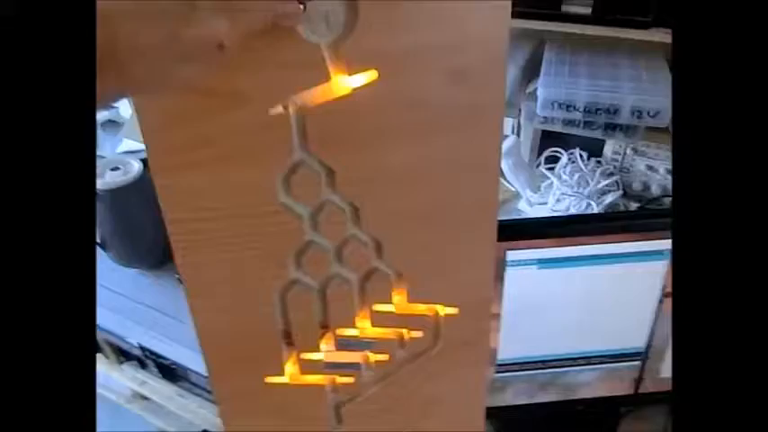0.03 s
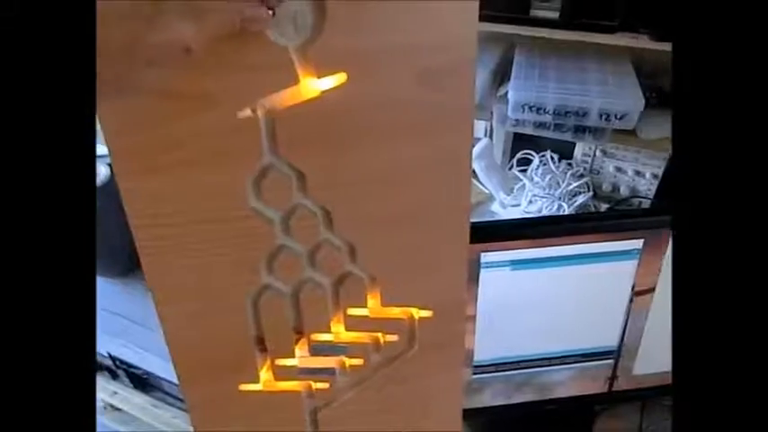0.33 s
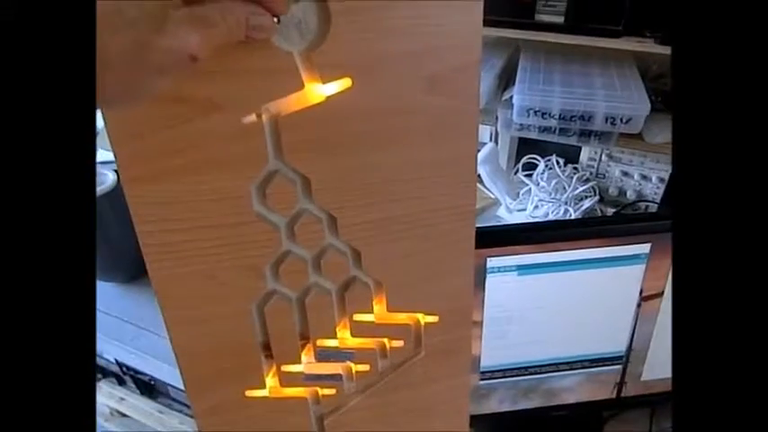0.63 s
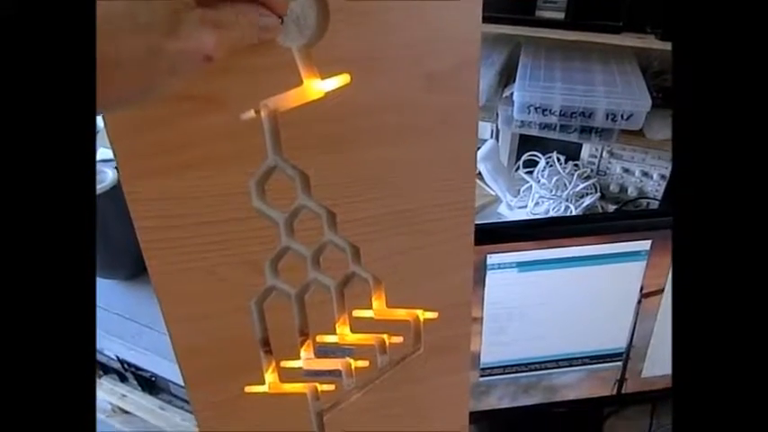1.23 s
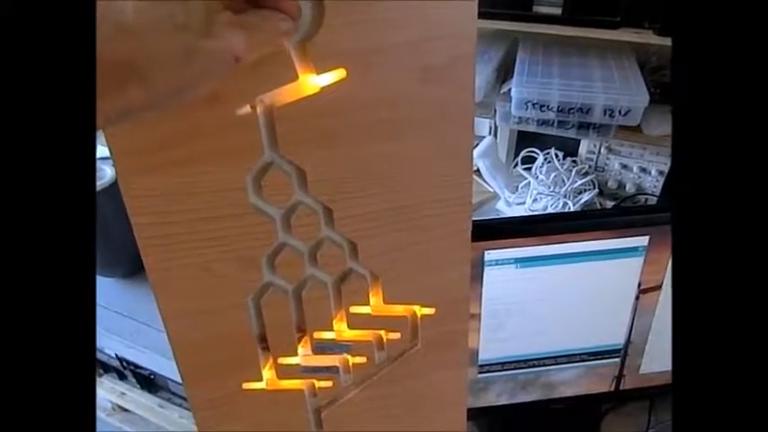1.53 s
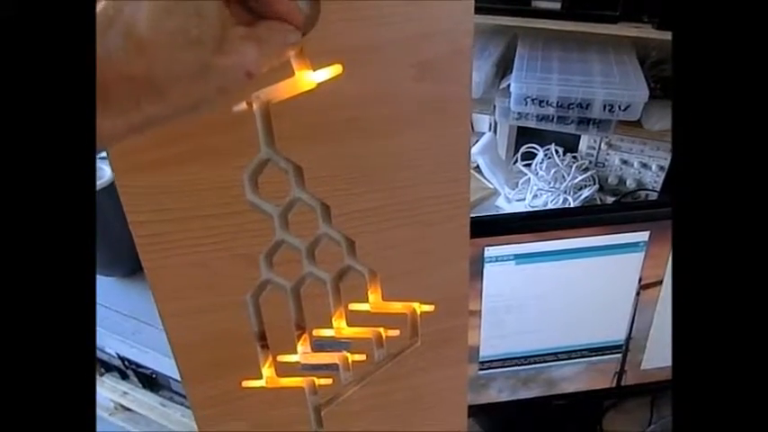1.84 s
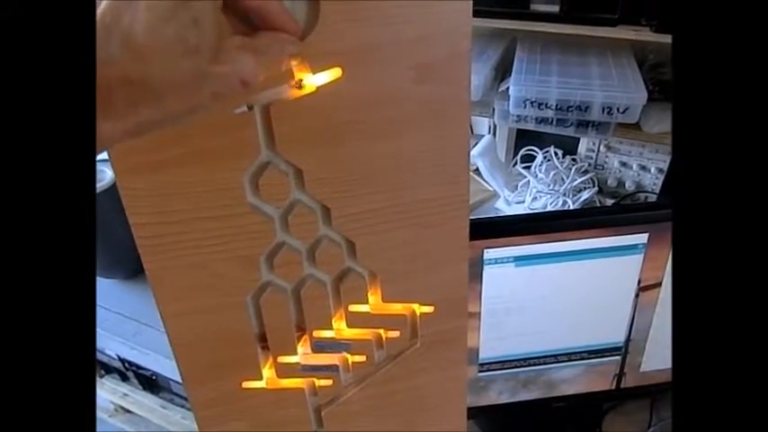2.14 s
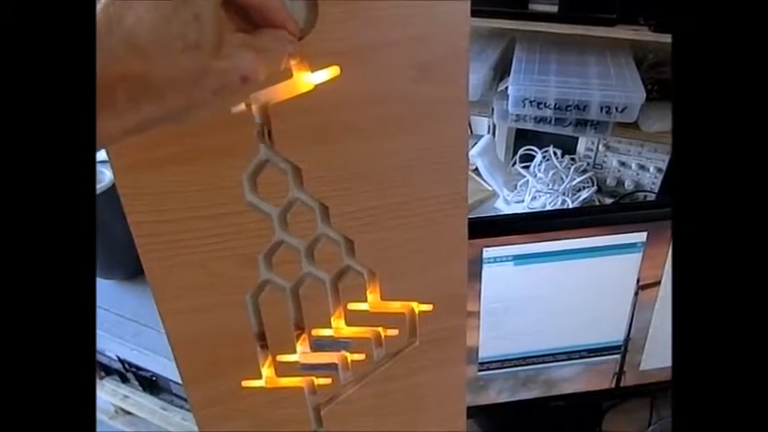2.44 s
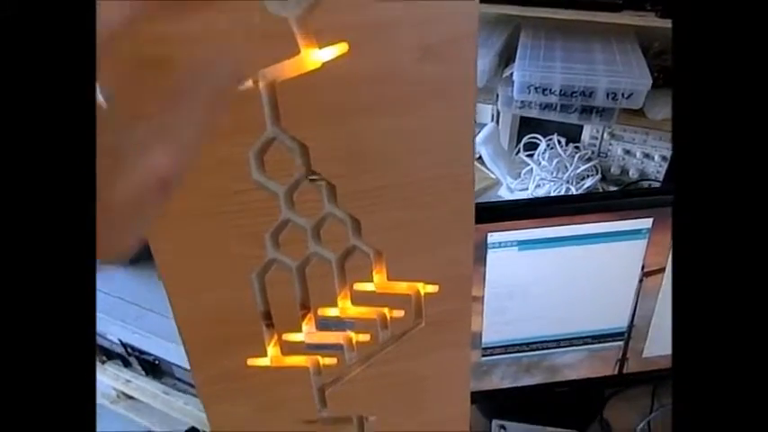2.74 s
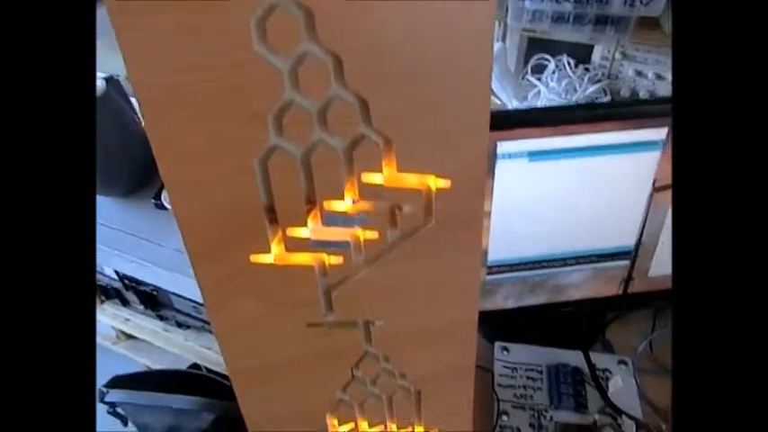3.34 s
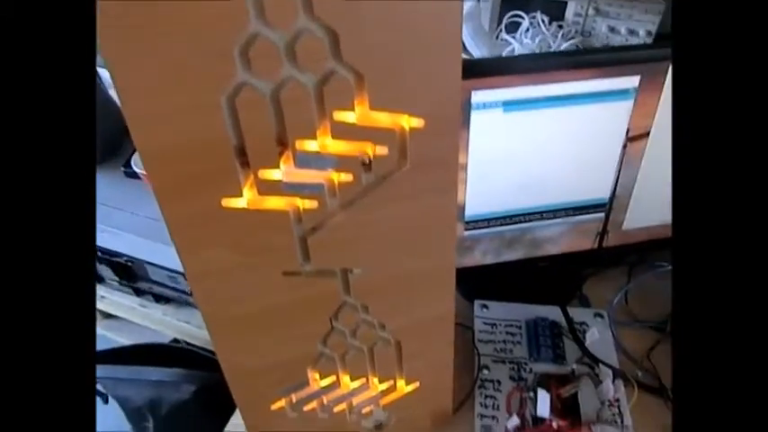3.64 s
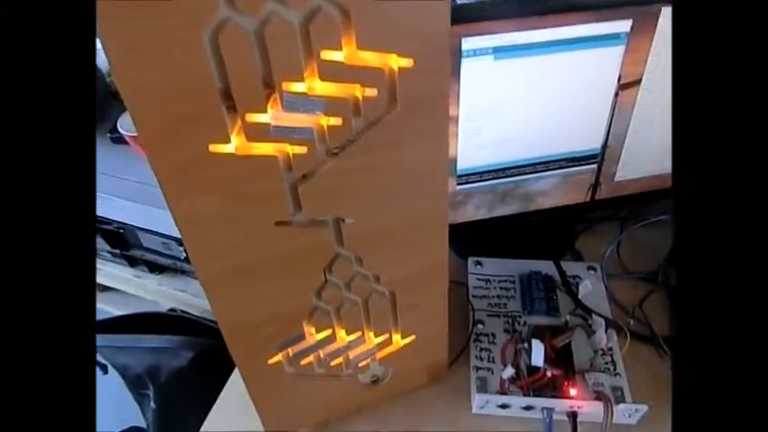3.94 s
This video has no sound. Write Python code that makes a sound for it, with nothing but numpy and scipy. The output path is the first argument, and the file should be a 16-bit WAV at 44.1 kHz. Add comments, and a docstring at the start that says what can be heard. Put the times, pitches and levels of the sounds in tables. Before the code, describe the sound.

A small hard ball clacks and chatters irregularly down the channels of a wooden board.

```python
"""Ball run on a wooden board

On a desk in a small room, close to a stereo pair of microphones, fingers fumble at a plastic gate, then a small
hard ball is let through it and falls down the carved channels of an upright board. It clacks from wall to wall,
chatters and tips small levers; each stretch rings in its own way, the whole board answers, and the room adds a
short tail. Underneath lie soft handling rumble, hiss and a faint whine."""
import sys
import numpy as np
from scipy import signal
from scipy.io import wavfile

SR = 44100
rng = np.random.default_rng(int(sys.argv[2]) if len(sys.argv) > 2 else 0)


def to_wav(s):
    """Save 16-bit WAV."""
    ch = np.atleast_2d(s).T  # columns
    pcm = np.round(np.clip(ch, -1, 1) * 32767)  # PCM
    wavfile.write(sys.argv[1], SR, pcm.astype(np.int16))


N = 176400

# Contacts on the board: the small soft taps at the gate are fingers fumbling with it, the rest are the ball's #
# (time [s], level [dB], brightness [dB/octave], low knock against the click [dB])
CONTACTS = [ (1.842, -66, -11.5, 16), (2.040, -40, -3, 15), (2.0526, -35.5, -9.5, 7.5),
            (2.0906, -6, 9.5, 7.5), (2.116, -32.5, -6, 15), (2.1520, -41.5, -11.5, 15.5),
            (2.1625, -12, 5, -1), (2.1715, -24, -2.5, 6), (2.182, -15, 5, 0), (2.228, -31.5, -9.5, 2.5),
            (2.2646, -21.5, 3, -7), (2.2939, -26.5, -3, 1.5), (2.3210, -35.5, -6, 7),
            (2.4364, -28, -2.5, 11), (2.454, -30.5, -4, 10.5), (2.507, -6, 4, 4.5),
            (2.520, -26.5, -3, 10.5), (2.5487, -8.5, 5.5, 5), (2.597, -18, -3, -1), (2.6889, -19.5, 7, -1),
            (2.6943, -13, 3.5, 6.5), (2.71, -31, -5.5, 3), (2.7343, -6.5, 1, -8), (2.7848, -31, -13.5, -17),
            (2.8282, -22, 8.5, 1), (2.8345, -13.5, 1.5, -1.5), (2.862, -6.5, -1, -4),
            (2.8667, -7.5, 2, -9.5), (2.8733, -19, -2, -6), (3.0410, -8.5, 1.5, -18),
            (3.0466, -12.5, -1, -3), (3.052, -19, -3, -4.5), (3.0590, -19, -4, -15),
            (3.067, -25.5, -7, -7.5), (3.0771, -22, -3, -7), (3.098, -15, -3, -4), (3.105, -16.5, -4, -10),
            (3.1123, -19.5, -3.5, 0), (3.118, -30.5, -2, 0), (3.151, -29, -7, -2),
            (3.249, -13.5, -3.5, -11), (3.2539, -14, 2, 5), (3.261, -14, 3.5, -7), (3.2683, -19.5, -3, -24),
            (3.2782, -26.5, -2.5, -6), (3.3385, -4, 6, 7.5), (3.3449, -8.5, -4, -10), (3.3607, -14, 4, -16),
            (3.3716, -21, -8.5, -7), (3.3827, -14.5, 3, 0), (3.4139, -24, -3, -4), (3.4504, -26.5, -6, -4),
            (3.4774, -27, -6.5, -15), (3.6037, -13.5, 2, 3), (3.6102, -13.5, -1.5, -14),
            (3.6177, -16, 1.5, -11), (3.629, -20.5, -2.5, -6), (3.6378, -26.5, -4, 2),
            (3.6502, -23, -6, -22), (3.6620, -26.5, -4, -1), (3.7165, -46.5, -2, 30),
            (3.7384, -16.5, 6.5, 11), (3.742, -4.5, 2.5, 1), (3.816, -26, -6, -2), (3.8381, -22, 10.5, 23),
            (3.8628, -25.5, 1.5, 7), (3.8965, -35, -9.5, 0.5)]
# Local ringing of each stretch of the run: (frequency [Hz], level [dB], t60 [s])
GATE_MODES = [(2000, -9.5, 0.056), (2153, -1, 0.021), (2540, -9.5, 0.015), (3834, -7.5, 0.017),
              (4480, -11.5, 0.017), (4910, -14, 0.011), (6980, -13.5, 0.0089), (8620, -16, 0.006),
              (9600, -22.5, 0.011)]
CHUTE_MODES = [(2070, -7, 0.034), (2806, -4.5, 0.025), (3020, -8, 0.0096), (3610, -11, 0.022),
               (4104, -1, 0.015), (4430, -13, 0.012), (5050, -2.5, 0.011), (5500, -15.5, 0.013),
               (6530, -22.5, 0.011), (6680, -13.5, 0.0075), (7700, -24, 0.02)]
MAZE_MODES = [(1638, -6.5, 0.039), (2113, -7.5, 0.024), (2700, -9, 0.067), (2974, -7, 0.026),
              (3240, -9, 0.019), (3690, -7, 0.032), (4050, -9.5, 0.064), (4510, -9, 0.014),
              (4840, -10, 0.0077), (5670, -12.5, 0.016), (6320, -14, 0.016), (6930, -21.5, 0.0088)]
LEVER_MODES = [(974, -16, 0.1), (1316, -13, 0.073), (1570, -15, 0.032), (2193, -11, 0.048),
               (2606, -12, 0.039), (3180, -7.5, 0.015), (4030, -7, 0.016), (4500, -11.5, 0.0077),
               (4960, -19, 0.011), (5480, -8, 0.0025), (6770, -9.5, 0.0066), (7720, -21.5, 0.014)]
EXIT_MODES = [(974.4, -8, 0.16), (1144, -19, 0.056), (1665, -14, 0.028), (2165, -12, 0.021),
              (2767, -7, 0.028), (4170, -11, 0.011), (4580, -6, 0.0083), (5700, -10, 0.0014),
              (6980, -14, 0.004)]
# Stretches from the top down: (start [s], mode table, local modes [dB], dense wood ring [dB],
# plank modes [dB], send to the room [dB], extra treble in that send [dB])
STRETCHES = [(0, GATE_MODES, -2, -3, 2, -12, 12.5), (2.40, CHUTE_MODES, -2.5, -3.5, -2, -1, 1.5),
             (2.65, MAZE_MODES, -2.5, -2, 0.5, -0.5, -2), (3.20, LEVER_MODES, -2, -1, -3.5, -2, -0.5),
             (3.55, EXIT_MODES, -1.5, 0, -1, -4, 1.5)]
# The whole board's dense ring: (frequency [Hz], band level [dB], t60 [s])
WOOD_RING = [(91, -46, 0.074), (230, -31, 0.023), (480, -30, 0.04), (896, -17.5, 0.014),
             (1490, -12.5, 0.072), (3420, -7.5, 0.034), (4930, -13.5, 0.02), (7240, -24.5, 0.0056),
             (9300, -31.5, 0.021), (14200, -25, 0.012)]
# The board's lowest separate modes: (frequency [Hz], level [dB], t60 [s])
PLANK_MODES = [(497.3, -25, 0.14), (612, -22.5, 0.035), (773, -24, 0.1), (961.4, -20.5, 0.07)]
# The ball rolling between contacts: (time [s], level [dB])
ROLL_LEVEL = [(2.0, -78), (2.06, -46.5), (2.22, -50.5), (2.38, -51), (2.48, -58), (2.9, -51.5),
              (3.3, -48.5), (4.0, -47.5)]
# Spectrum of the rolling: (frequency [Hz], relative band level [dB])
ROLL_COLOUR = [(90, -15.5), (260, 1), (550, 3), (1000, 0.5), (2200, 5), (4500, -10.5), (9000, -11.5)]
# The small room's tail: (frequency [Hz], level [dB], t60 [s])
ROOM_TAIL = [(151, -16.5, 0.18), (487, -19.5, 0.37), (1120, -22.5, 1), (2800, -18, 0.83), (4340, -14, 0.85),
             (7200, -17.5, 0.79), (13000, -17, 0.68)]
# Handling rumble at the microphones: (time [s], level [dB])
RUMBLE_LEVEL = [(.2, -55), (.6, -57.5), (1.45, -59), (1.58, -54.5), (1.75, -59), (2.1, -55), (4.0, -62.5)]
# Spectra of the rumble and the hiss: (frequency [Hz], relative band level [dB])
RUMBLE_COLOUR = [(25, -5), (38, -2.5), (60, -8), (100, -3), (180, -16.5), (400, -12.5), (1500, -44)]
HISS_COLOUR = [(40, -7.5), (120, -4.5), (300, 1), (700, 0.5), (1400, -3), (3000, 1), (5000, -2),
               (8000, 1.5), (11000, -1), (15000, 2.5)]
# A faint whine that comes and goes: (time [s], level [dB])
WHINE_LEVEL = [(.5, -81), (.54, -67.5), (.78, -69.5), (1.0, -81), (1.2, -75), (1.27, -65), (1.37, -77),
               (1.6, -66.5), (1.78, -66.5), (1.82, -72), (1.88, -69), (2.4, -64.5)]
# Image at the microphone pair: (frequency [Hz], side against mid for direct sound [dB],
# the same for diffuse sound [dB], left minus right [dB])
MIC_PAIR = [(100, -44, -10, -2), (587, -32, -11, -2.5), (1900, -14, -4.5, -2.5), (4000, -5, 1, -3.5),
            (7300, -4.5, 0, 1.5), (12900, 0.5, 1, -1)]

CLICK_DB, RING_S, MODE_SCATTER_DB = 15, 0.15, 2
KNOCK_BELOW_HZ, TILT_PIVOT_HZ = 1167, 3520
CONTACT_S, SOFT_CONTACT_S, SOFT_TILT_DB_PER_OCTAVE = 0.00004, 0.001, -1.5
EARLY_DB, EARLY_T60_S, EARLY_DELAY_S = -5, 0.046, 0.0015
ROOM_BUILD_S, ROOM_TREBLE_HZ = 0.0043, 6000
MODES_IN_ROOM = 0.15  # the room hears mostly the broad board, and only this share of the local modes
WHINE_HZ, WHINE_WIDTH_HZ, HISS_DB = 3860, 200, -60
START_S, OVERLOAD, CUTOFF_HZ = 0.198, 0.8, 16800

EDGES_HZ = 22 * 2 ** np.arange(0, 9.6, .5)  # half-octave bands
CENTRES_HZ = np.sqrt(EDGES_HZ[1:] * EDGES_HZ[:-1])
BANK = [signal.butter(2, pair, "band", fs=SR, output="sos") for pair in zip(EDGES_HZ, EDGES_HZ[1:])]


def knocks():
    """Each contact rings the board and its own stretch; returns the direct sound and the room send."""
    size = int(RING_S * SR)
    t = np.arange(size) / SR
    treble = signal.butter(1, ROOM_TREBLE_HZ, "high", fs=SR, output="sos")
    direct, sent = np.zeros((2, 2, N + size))
    for (onset_s, db, tilt_db, knock_db), wood in zip(CONTACTS, wood_rings(t)):
        stretch = [row for row in STRETCHES if row[0] <= onset_s][-1]
        _, modes, modes_db, wood_db, plank_db, room_db, treble_db = stretch
        plank = from_db(plank_db) * mode_ring(t, modes=PLANK_MODES, tilt_db=tilt_db, knock_db=knock_db)
        board = from_db(wood_db) * wood + plank
        local = from_db(modes_db) * mode_ring(t, modes, tilt_db, knock_db)
        spread = board + MODES_IN_ROOM * local
        spread = spread + (from_db(treble_db) - 1) * signal.sosfilt(treble, spread)
        start = int(onset_s * SR)
        direct[:, start:start + size] += from_db(CLICK_DB + db) * (board + local)
        sent[:, start:start + size] += from_db(CLICK_DB + db + room_db) * spread
    return direct[:, :N], sent[:, :N]


def wood_rings(t):
    """One noise burst per contact: wood resonances too dense to tell apart, dying quickly."""
    _, _, tilt_db, knock_db = np.transpose(CONTACTS)
    # Dull contacts press rather than snap, so the wood swells more slowly.
    softness = np.clip(tilt_db / SOFT_TILT_DB_PER_OCTAVE - 0.5, 0, 2)[:, None, None]
    attack = 1 - np.exp(-t / (CONTACT_S + softness * SOFT_CONTACT_S))
    bursts = rng.standard_normal((2, len(CONTACTS), 2, len(t))) * attack
    rings = 0
    for k, (hz, sos) in enumerate(zip(CENTRES_HZ, BANK)):
        if hz > WOOD_RING[0][0] / 2:
            decay = fade(t, t60=at_hz(WOOD_RING, hz, column=2))
            band = stereo(signal.sosfilt(sos, bursts[k % 2] * decay + 1e-18), hz)
            gain = from_db(at_hz(WOOD_RING, hz)) * strike_gain(hz, tilt_db, knock_db)
            rings = rings + band * gain[:, None, None]
    return rings


def mode_ring(t, modes, tilt_db, knock_db):
    """Modes struck once; no two contacts land on the same spot, so strength, sign and pitch vary."""
    rings = 0
    for hz, db, t60 in modes:
        strength, sign, side, shift = rng.standard_normal(4)
        width_hz = np.log(1000) / (np.pi * t60)
        phase = 2 * np.pi * (hz + width_hz * np.tanh(shift)) * t
        attack = 1 - np.exp(-t / (CONTACT_S + .5 / hz))
        mid_side = np.array([np.sin(phase), np.sign(side) * np.cos(phase)]) * attack * fade(t, t60)
        gain = from_db(db + MODE_SCATTER_DB * strength) * strike_gain(hz, tilt_db, knock_db)
        rings = rings + np.sign(sign) * gain * stereo(mid_side, hz)
    return rings


def strike_gain(hz, tilt_db, knock_db):
    """How strongly a contact excites a frequency: hard ones are bright, square ones knock the board."""
    octaves = np.log2(np.clip(hz, KNOCK_BELOW_HZ, 2 * TILT_PIVOT_HZ) / TILT_PIVOT_HZ)
    return from_db(tilt_db * octaves + knock_db / (1 + (hz / KNOCK_BELOW_HZ) ** 4))


def ball_roll():
    """Soft noise of the ball rolling along the channels, under the clacks."""
    return level(ROLL_LEVEL) * coloured_noise(ROLL_COLOUR)


def room(sent):
    """Quick scatter from the desk and things close by, then the small room's diffuse tail."""
    t = np.arange(SR) / SR
    white = rng.standard_normal((2, 2, SR))
    early_envelope = fade(t, EARLY_T60_S) * (t > EARLY_DELAY_S)
    build_up = 1 - np.exp(-t / ROOM_BUILD_S)
    response = 0
    for k, (hz, sos) in enumerate(zip(CENTRES_HZ, BANK)):
        tail_envelope = build_up * fade(t, t60=at_hz(ROOM_TAIL, hz, column=2))
        tail = stereo(signal.sosfilt(sos, white[k % 2] * tail_envelope), hz, diffuse=True)
        early = stereo(signal.sosfilt(sos, white[k % 2] * early_envelope + 1e-18), hz)
        response = response + from_db(at_hz(ROOM_TAIL, hz)) * tail
        response = response + from_db(EARLY_DB) * np.sqrt(hz / SR) * early
    return signal.fftconvolve(sent.mean(axis=0, keepdims=True), response, axes=1)[:, :N]


def background():
    """Handling rumble at the microphones, a thin whine of narrow-band noise and steady hiss."""
    edges_hz = [WHINE_HZ - WHINE_WIDTH_HZ / 2, WHINE_HZ + WHINE_WIDTH_HZ / 2]
    narrow = signal.butter(2, edges_hz, "band", fs=SR, output="sos")
    whine_band = signal.sosfilt(narrow, rng.standard_normal((2, N)))
    whine = level(WHINE_LEVEL) * stereo(whine_band, WHINE_HZ) * np.sqrt(N)
    rumble = level(RUMBLE_LEVEL) * coloured_noise(RUMBLE_COLOUR)
    hiss = from_db(HISS_DB) * coloured_noise(HISS_COLOUR)
    return rumble + whine + hiss


def coloured_noise(colour):
    """Steady noise of a given spectrum, reaching the microphones from all round; rms 1."""
    white = rng.standard_normal((2, 2, N))
    noise = 0
    for k, (hz, sos) in enumerate(zip(CENTRES_HZ, BANK)):
        band = stereo(signal.sosfilt(sos, white[k % 2]), hz, diffuse=True)
        noise = noise + from_db(at_hz(colour, hz)) * band
    return unit_energy(noise) * np.sqrt(N)


def stereo(mid_side, hz, diffuse=False):
    """Mid and side to the left and right microphones: narrow in the bass, wider for diffuse sound."""
    balanced = mid_side / (np.linalg.norm(mid_side, axis=-1, keepdims=True) + 1e-20)
    mid, side = np.split(balanced, 2, axis=-2)
    width = from_db(at_hz(MIC_PAIR, hz, column=2 if diffuse else 1))
    left_right = np.array([[1], [-1]])
    pan = from_db(left_right * at_hz(MIC_PAIR, hz, column=3) / 2)
    return unit_energy((mid + width * left_right * side) * pan)


def unit_energy(x):
    """Scale each stereo sound to a mean energy of 1 per channel."""
    energy = np.sum(x ** 2, axis=-1, keepdims=True)
    return x / np.sqrt(energy.mean(axis=-2, keepdims=True) + 1e-20)


def fade(t, t60):
    """Exponential decay, 60 dB down after t60 seconds."""
    return np.exp(-np.log(1000) * t / max(t60, 1e-3))


def level(curve):
    """Gain over time from rows of (time [s], level [dB])."""
    return from_db(np.interp(np.arange(N) / SR, *np.transpose(curve)))


def at_hz(table, hz, column=1):
    """Interpolate a table's column over log frequency."""
    table = np.array(table)
    return np.interp(np.log(hz), np.log(table[:, 0]), table[:, column])


def from_db(db):
    """Decibels to gain."""
    return 10 ** (np.asarray(db) / 20)


def scene():
    """The ball's run close by, the room around it and the background underneath."""
    direct, sent = knocks()
    return direct + room(sent) + ball_roll() + background()


def record(dry):
    """The microphones open after a moment of silence; high peaks are rounded and the top is cut."""
    mics_open = np.arange(N) >= START_S * SR
    rounded = OVERLOAD * np.tanh(dry / OVERLOAD)
    low_pass = signal.cheby2(12, 70, CUTOFF_HZ, fs=SR, output="sos")
    return signal.sosfilt(low_pass, rounded * mics_open)


dry = scene()
out = record(dry)
to_wav(out)
```